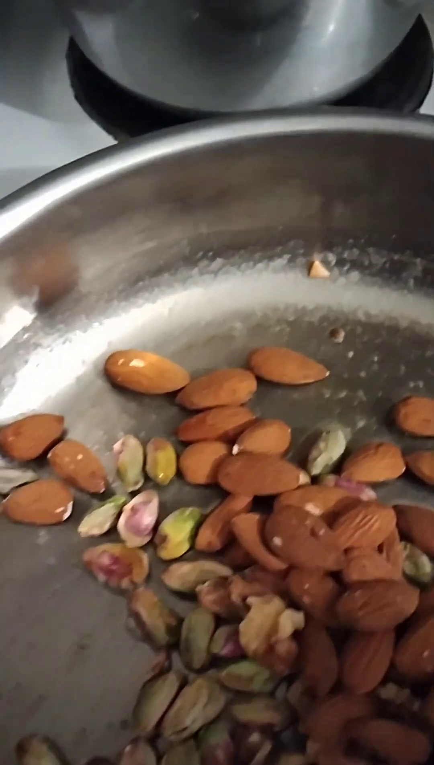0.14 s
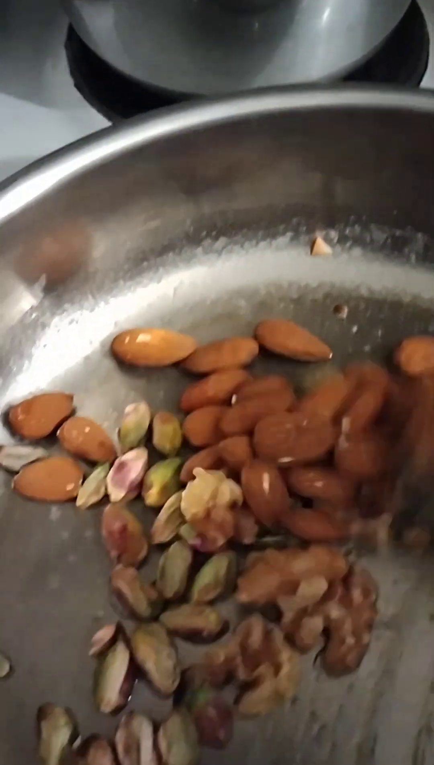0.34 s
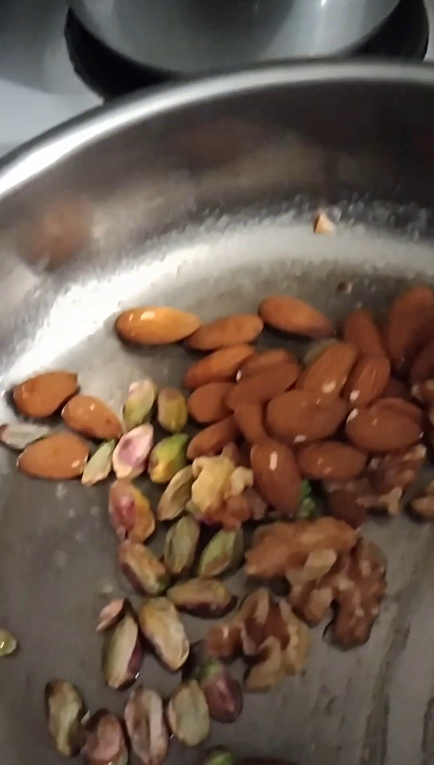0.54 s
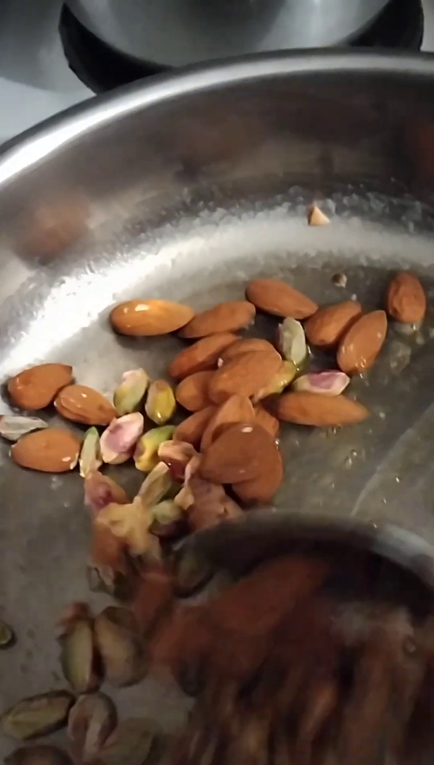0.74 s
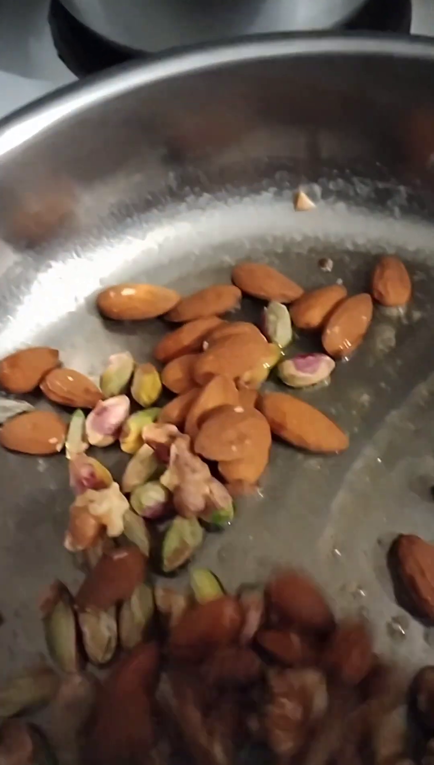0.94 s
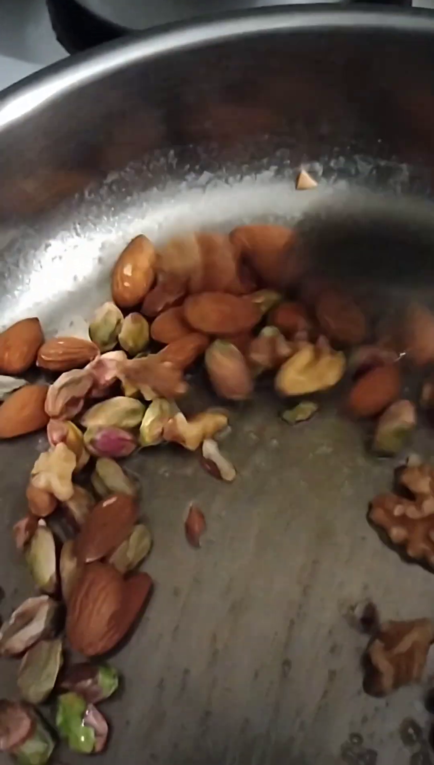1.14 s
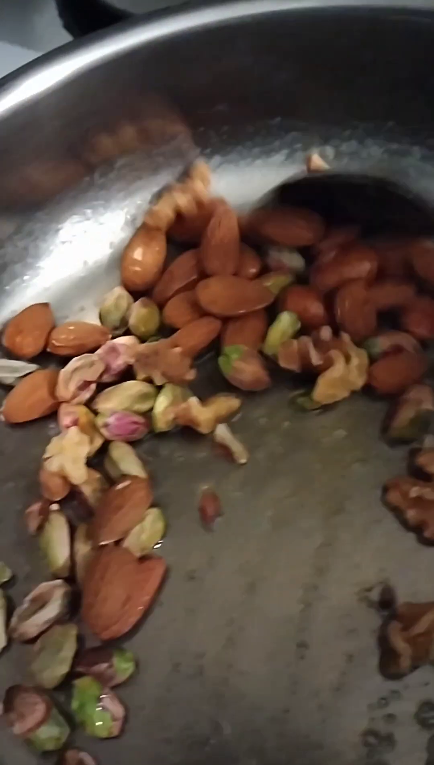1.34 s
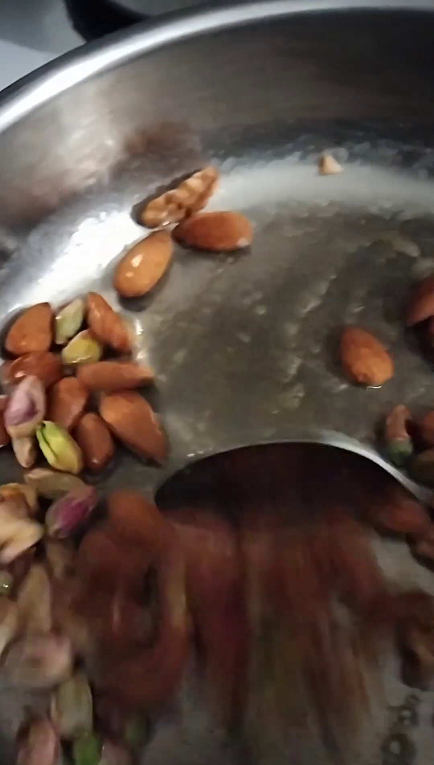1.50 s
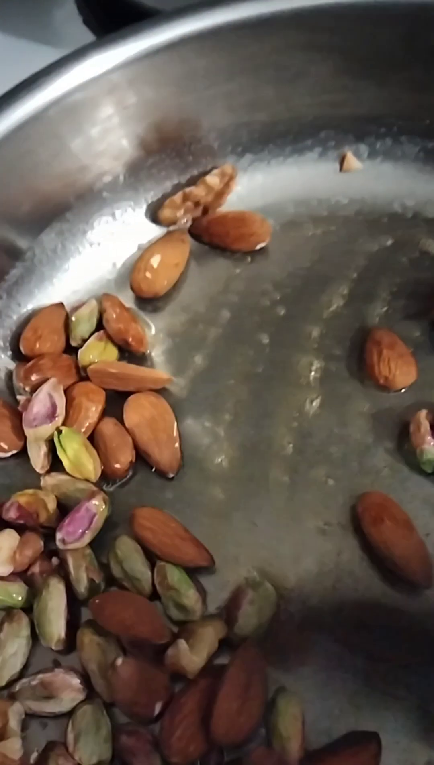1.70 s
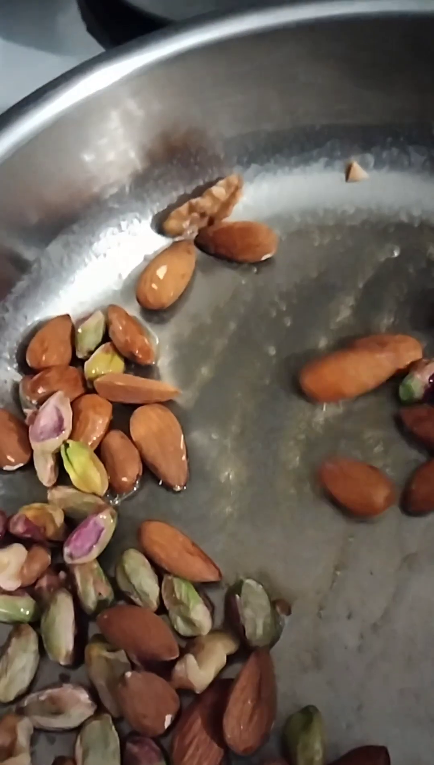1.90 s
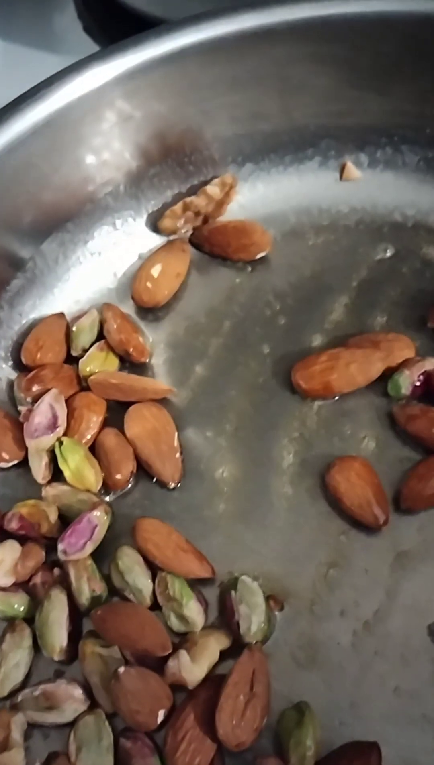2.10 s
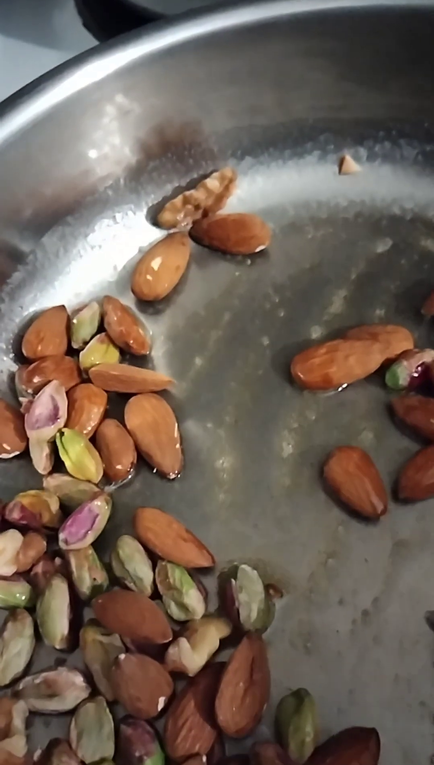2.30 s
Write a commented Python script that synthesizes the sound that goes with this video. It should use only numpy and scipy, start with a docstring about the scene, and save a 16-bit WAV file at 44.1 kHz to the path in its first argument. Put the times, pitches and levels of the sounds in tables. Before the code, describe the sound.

Nuts are stirred with a metal spoon in a steel pan, heard close in a small kitchen. After near quiet with tiny fat pops, a ringing clank at 0.2 s leads into a scrape; more knocks and short rasping scrapes follow around 0.65, 1.0 and 1.4 s. Nuts click and patter throughout. A knock at 1.8 s, crackling fat, then a bright rim chatter at 2.05 s rings and fades.

```python
"""A steel spoon knocks on a frying pan and scrapes across it in four strokes, close to the microphone in a small kitchen.
Nuts click and patter around it, hot fat crackles and pops, and near the end the spoon chatters on the rim.
Blows are short noise bursts with decaying steel modes; the scrape is stick-slip impulses through resonances plus
a coarse rasp. Nuts and bubbles are random contacts tuned by size. A short room tail and kitchen air lie behind."""
import sys
import numpy as np
from scipy import signal
from scipy.fft import rfft, irfft, next_fast_len
from scipy.io import wavfile
from scipy.ndimage import uniform_filter1d, map_coordinates

SR = 44100
rng = np.random.default_rng(int(sys.argv[2]) if len(sys.argv) > 2 else 0)


def int16_out(signal):
    """Quantize to a 16-bit WAV file."""
    q = np.round(np.clip(np.atleast_2d(signal).T, -1, 1) * 32767)
    wavfile.write(sys.argv[1], SR, q.astype(np.int16))


N = 103635  # length in samples


def amp(db):
    """Gain of a level in dB."""
    return 10 ** (np.asarray(db) / 20)


def unit(x):
    """Scale to rms 1."""
    return x / np.sqrt(np.mean(x ** 2) + 1e-20)


def peak_unit(x, size=176):
    """Scale so that the loudest 4 ms have rms 1."""
    power = uniform_filter1d(x ** 2, size, mode="constant")
    return x / np.sqrt(power.max() + 1e-20)


def clock():
    """Half-second time axis of one blow, in seconds."""
    return np.arange(SR // 2) / SR


def along(points, hz):
    """Read (Hz, value) points on a log frequency axis."""
    f, v = np.transpose(points)
    return np.interp(np.log(hz + 1), np.log(f + 1), v)


def level(rows, outside=None):
    """Gain per sample from (s, dB) points; the end values hold unless an outside dB is given."""
    s, db = np.transpose(rows)
    return amp(np.interp(np.arange(N) / SR, s, db, outside, outside))


def wobble(rate):
    """A random curve through `rate` random values a second."""
    return map_coordinates(rng.standard_normal(2000), [np.arange(N) * rate / SR], mode="wrap")


def add(track, s, x):
    """Mix x in at time s."""
    i = max(round(s * SR), 0)
    track[i:i + len(x)] += x[:len(track) - i]


def colour(x, points, size=4096):
    """Causal minimum-phase filter with the given (Hz, dB) shape."""
    log_gain = np.log(amp(along(points, np.fft.rfftfreq(size, 1 / SR))))
    cepstrum = irfft(log_gain)
    # fold the cepstrum forward so the filter never sounds early
    cepstrum[1:size // 2] *= 2
    cepstrum[size // 2 + 1:] = 0
    return signal.fftconvolve(x, irfft(np.exp(rfft(cepstrum))))[:len(x)]


def resonate(x, peaks, q):
    """Pass x through parallel (Hz, dB) resonances of sharpness q."""
    m = next_fast_len(len(x) + SR // 10, True)
    f = np.fft.rfftfreq(m, 1 / SR)
    response = sum(amp(db) * f / (f + 1j * q * (f * f - c * c) / c) for c, db in peaks)
    return irfft(rfft(x, m) * response, m)[:len(x)]


def burst(t60):
    """Noise that falls by 60 dB in t60 seconds."""
    t = clock()
    return rng.standard_normal(len(t)) * amp(-60 * t / t60)


RING_WAVER = .85  # phase unsteadiness of ringing steel, radians


def ring(modes, t60):
    """Decaying (Hz, dB) modes of steel, each with a slightly unsteady phase."""
    t = clock()
    tones = 0
    for hz, db in modes:
        waver = RING_WAVER * wobble(171.0)[:len(t)]
        tones = tones + amp(db) * np.sin(2 * np.pi * hz * t + waver)
    return peak_unit(amp(-60 * t / t60) * tones)


def contacts(rate, spread_db):
    """Random impulses of either sign and uneven size, `rate` a second on average."""
    size = amp(spread_db * np.clip(rng.standard_normal(N), -2, 2))
    return (rng.random(N) < rate / SR) * rng.choice([-1, 1], N) * size


# spoon knocks on the pan: start_s, bass_db, middle_db, treble_db, rattle_t60_s, ring_db (relative), pitch_hz
KNOCK_ROWS = [(0.185, -26.5, -14.5, -12, 0.26, 0, 1947), (0.2033, -14.5, -12, -24.5, 0.021, -7, 850),
              (0.6382, -53, -11.5, -11, 0.029, -25, 2984), (0.9824, -26, -20.5, -29.5, 0.062, -31, 446),
              (1.005, -22.5, -23, -18.5, 0.035, -11, 6330), (1.027, -18.5, -16, -15, 0.058, -18, 4030),
              (1.3609, -30, -19.5, -13, 0.034, -19, 820), (1.801, -22, -18, -18.5, 0.059, -13, 960)]
# ring of the pan: mode_hz, level_db (relative)
PAN_MODES = [(1903, -9), (2700, -4.5), (3140, -5), (5647, -9.5), (6600, -10)]
# edges of the bass, middle and treble bands: edge_hz
BAND_EDGES = [330, 900, 2400, 8300]
CRACK_T60, KNOCK_T60, PAN_T60 = .004, .028, 0.33  # decays, s
KNOCK_DB = -3.5  # pitched knock against the loudest band


def knocks():
    """Each blow is a crack, a rattle and the pan's ring, balanced in three bands, with a short pitched knock."""
    out = np.zeros(N)
    for s, *band_db, rattle_t60, ring_db, knock_hz in KNOCK_ROWS:
        blow = peak_unit(burst(CRACK_T60)) + peak_unit(burst(rattle_t60))
        blow += amp(-1.5) * burst(0.033)
        blow += amp(ring_db) * ring(PAN_MODES, PAN_T60)
        add(out, s, amp(max(band_db) + KNOCK_DB) * ring([(knock_hz, 0)], KNOCK_T60))
        for edges, db in zip(zip(BAND_EDGES, BAND_EDGES[1:]), band_db):
            band = signal.butter(2, edges, "band", fs=SR, output="sos")
            add(out, s, amp(db) * peak_unit(signal.sosfilt(band, blow)))
    return out


# low thuds of the pan on the hob: start_s, level_db, pitch_hz
THUD_ROWS = [(0.202, -27, 65), (0.643, -25, 53), (0.983, -22.5, 170), (1.728, -29, 268), (1.789, -30, 148),
             (2.062, -29, 95)]
THUD_T60 = 0.14  # decay, s


def thuds():
    """Decaying noise through one broad low resonance: the pan bumps on the hob."""
    out = np.zeros(N)
    for s, db, hz in THUD_ROWS:
        add(out, s, amp(db) * peak_unit(resonate(burst(THUD_T60), [(hz, 0)], q=1.7)))
    return out


# the edge catches unevenly: catches per second, spread in dB, sharpness of each pitch
CATCH_PER_S, CATCH_SPREAD_DB, CATCH_Q = 110, 7.5, 8


def rasp():
    """Twenty pitches of noise flare separately as the edge catches, so the coarse colour keeps shifting."""
    bands = 0
    for hz in np.geomspace(700, 14000, 20):
        catches = amp(CATCH_SPREAD_DB * np.clip(wobble(CATCH_PER_S), -2, 1))
        bands = bands + resonate(rng.standard_normal(N) * catches, [(hz, 0)], CATCH_Q)
    return unit(bands)


# four strokes of the spoon, one list of points each: time_s, level_db
STROKE_LEVELS = [
    [(.215, -32), (.29, -32), (.336, -17.5), (.36, -25.5), (.375, -46)],
    [(.645, -28), (.72, -22), (.757, -20), (.775, -29)],
    [(1.035, -28.5), (1.114, -16.5), (1.131, -19.5), (1.146, -29)],
    [(1.425, -28), (1.45, -29), (1.475, -18), (1.55, -16.5), (1.6, -37)],
]
# colour of each stroke, one row each: level_db at every frequency of COLOUR_POINTS (relative)
STROKE_SHAPES = [
    [-25, -3, -2, 4, -18, 8, 0.5, -2.5],
    [-11, 3, 0.5, 0, -3, -4.5, -14.5, -11],
    [1, 10, -7, 26, 5.5, 21.5, 9, 8.5],
    [4, 0.5, 14.5, 2, 2.5, 4, -11, -9],
]
# frequencies of the stroke colours: pitch_hz
COLOUR_POINTS = [300, 1000, 1900, 3700, 4800, 7000, 11500, 13600]
# how much of each stroke rings in the steel: power_share (0 to 1)
STEEL_SHARES = [0.93, 0.089, 0.8, 0.26]
# rubbed resonances of the steel: pitch_hz, level_db (relative)
STEEL_PEAKS = [(1060, 16), (2660, -3), (3180, 6), (4055, 3), (5380, 10.5), (6900, -2), (7650, -10),
               (13700, 9.5)]
STEEL_Q = 45
SLIPS_PER_S, SLIP_SPREAD_DB, JUDDER_DB = 1800, 4, 2.2
GLIDE_SAMPLES = 10.3  # scale of the random time shift that bends the resonances


def scrapes():
    """The edge sticks and slips: a coarse rasp plus steel that wavers as the contact point moves."""
    out = np.zeros(N)
    judder = amp(JUDDER_DB * np.clip(wobble(170), -2, 1))
    slips = contacts(SLIPS_PER_S, SLIP_SPREAD_DB) * judder
    ringing = resonate(slips, STEEL_PEAKS, STEEL_Q)
    steel = unit(map_coordinates(ringing, [np.arange(N) + GLIDE_SAMPLES * wobble(35)]))
    grit = unit(rasp() * judder)
    for stroke, shape, share in zip(STROKE_LEVELS, STROKE_SHAPES, STEEL_SHARES):
        rub = np.sqrt(share) * steel + np.sqrt(1 - share) * grit
        rub = unit(colour(rub, list(zip(COLOUR_POINTS, shape))))
        out += level(stroke, -120) * rub  # all but silent outside its stroke
    return out


# colour of a nut-sized contact: pitch_hz, level_db (relative)
CLICK_COLOUR = [(300, -3), (800, 10), (2600, 1.5), (4000, 1.5), (6300, -1.5), (11000, -19)]
NUT_T60, NUT_TAIL_T60 = .014, .06  # decays, s


def click():
    """A hard little contact: a short noise burst with a weaker, longer tail."""
    return peak_unit(colour(peak_unit(burst(NUT_T60)) + amp(-7) * burst(NUT_TAIL_T60), CLICK_COLOUR))


# light touches of the spoon's bowl on the pan: start_s, level_db
PING_ROWS = [(0.5002, -17), (0.5403, -28), (1.588, -18.5)]
# ring of the spoon's bowl: mode_hz, level_db (relative)
SPOON_MODES = [(5380, 0), (6630, -4)]
SPOON_T60 = .04  # decay, s


def pings():
    """Light touches click and set the bowl's modes ringing."""
    out = np.zeros(N)
    for s, db in PING_ROWS:
        add(out, s, amp(db) * peak_unit(click() + ring(SPOON_MODES, SPOON_T60)))
    return out


# ring of the rim: mode_hz, level_db (relative)
RIM_MODES = [(1125, -2), (2080, -8), (2762, -2.5), (4678, -13)]
# colour of the chatter: pitch_hz, level_db (relative)
CHATTER_COLOUR = [(1900, 0), (4400, -2), (5600, 9.5), (9000, 3.5)]
RIM_S, RIM_HOLD_S, RIM_T60, RIM_RING_T60 = 2.0395, 0.027, 0.058, 0.54  # start, hold and decays, s
RIM_DB, RIM_RING_DB = -12.5, -30


def rim():
    """The spoon chatters briefly on the rim, as held then fading noise, and the rim's modes ring on."""
    out, t = np.zeros(N), clock()
    fade = amp(-60 * np.maximum(t - RIM_HOLD_S, 0) / RIM_T60)
    chatter = unit(colour(rng.standard_normal(len(t)), CHATTER_COLOUR)) * fade
    add(out, RIM_S, amp(RIM_DB) * chatter + amp(RIM_RING_DB) * ring(RIM_MODES, RIM_RING_T60))
    return out


# single nuts dropping on the steel: start_s, level_db, pitch_hz
NUT_ROWS = [(0.4446, -23.5, 3570), (0.5677, -22, 3540), (0.597, -18.5, 763), (0.815, -23.5, 3630),
            (0.84, -28.5, 1500), (0.879, -22.5, 3350), (1.277, -29.5, 3640), (1.301, -32, 3560),
            (1.3482, -20.5, 960), (1.422, -19, 3170), (1.688, -23.5, 2200), (1.733, -26.5, 1500),
            (1.78, -20, 4130), (1.859, -23.5, 4000), (2.19, -35, 1960), (2.339, -36, 2830)]
NUT_RING_DB, NUT_Q = 0, 9


def single_nuts():
    """Each nut is a click plus a short burst through one resonance at its own pitch."""
    out = np.zeros(N)
    for s, db, hz in NUT_ROWS:
        tone = peak_unit(resonate(burst(NUT_T60), [(hz, 0)], NUT_Q))
        add(out, s, amp(db) * peak_unit(click() + amp(NUT_RING_DB) * tone))
    return out


# the heap tumbling and settling: time_s, level_db (before the trims PATTER_DB and BODY_DB)
TUMBLE_LEVEL = [(.19, -66), (.24, -33.5), (.87, -33.5), (.96, -41.5), (1.16, -28.5), (1.28, -38.5),
                (1.42, -30.5), (1.7, -35), (1.85, -33.5), (2.03, -46.5), (2.35, -54.5)]
# contacts per second of each size of nut, spread in dB, sharpness of pitch
PATTER_PER_S, PATTER_SPREAD_DB, PATTER_Q = 36, 4, 3
PATTER_DB = -3.5


def heap():
    """Sparse patter of five sizes of nut: random clicks, small nuts pitched higher than large ones."""
    patter = 0
    for hz in np.geomspace(1000, 4800, 5):
        hits = signal.fftconvolve(contacts(PATTER_PER_S, PATTER_SPREAD_DB), click())[:N]
        patter = patter + unit(resonate(hits, [(hz, 0)], q=PATTER_Q))
    return amp(PATTER_DB) * level(TUMBLE_LEVEL) * unit(patter)


# the pan's low resonances: pitch_hz, level_db (relative)
BODY_PEAKS = [(125, 2.5), (430, -7.5), (720, 4), (1040, 2)]
BODY_DB, BODY_Q = -4, 6.3


def pan_body():
    """Hollow murmur: noise through the pan's low resonances, shaken as the heap tumbles."""
    body = unit(resonate(rng.standard_normal(N), BODY_PEAKS, BODY_Q))
    return amp(BODY_DB) * level(TUMBLE_LEVEL) * body


# loud pops of fat: start_s, level_db
POP_ROWS = [(0.032, -38.5), (.054, -35.5), (1.392, -25.5), (1.634, -21), (1.716, -30), (1.8697, -24.5),
            (1.9884, -24.5)]
# crackle of the small bubbles: time_s, level_db
SIZZLE_LEVEL = [(.3, -65), (.85, -46.5), (1.25, -48), (1.75, -39.5), (2.2, -47.5)]
# colour of pops and bubbles: pitch_hz, level_db (relative)
FAT_COLOUR = [(500, -97), (3000, -15.5), (8000, 3)]


def fat():
    """Tiny bubbles of eight sizes burst as random impulses through resonances, with a few sharp noise pops."""
    pops = np.zeros(N)
    for s, db in POP_ROWS:
        add(pops, s, amp(db) * peak_unit(colour(burst(0.0032), FAT_COLOUR)))
    bubbles = 0
    for hz in np.linspace(4500, 14500, 8):
        bubbles = bubbles + unit(resonate(contacts(36, 7.5), [(hz, 0)], q=4.5))
    return pops + level(SIZZLE_LEVEL) * unit(colour(bubbles, FAT_COLOUR))


ROOM_DB, ROOM_T60, ROOM_TOP_HZ = -12, 0.32, 9000  # decay in s


def kitchen(x):
    """A short room tail: x convolved with decaying, softened noise."""
    soften = signal.butter(1, ROOM_TOP_HZ, fs=SR, output="sos")
    tail = signal.sosfilt(soften, burst(ROOM_T60))
    return signal.fftconvolve(x, tail / np.linalg.norm(tail))[:N]


# colour of the kitchen air: pitch_hz, level_db (relative)
AIR_COLOUR = [(90, 3.5), (420, -5), (1800, -40), (9000, -14)]
AIR_DB = -53


def kitchen_air():
    """Steady coloured noise behind everything."""
    return amp(AIR_DB) * unit(colour(rng.standard_normal(N), AIR_COLOUR))


def scene():
    """The pan close up with its room tail; body murmur and kitchen air are added without the tail."""
    spoon = knocks() + thuds() + scrapes() + pings() + rim()
    pan = spoon + single_nuts() + heap() + fat()
    # the heap's patter and the fat reach the room too
    return (pan + amp(ROOM_DB) * kitchen(pan) + pan_body() + kitchen_air())[None]


TOP_HZ = 16000  # band limit of the recorder


def record(dry):
    """The recorder clips at full scale and keeps nothing above its band limit."""
    m = next_fast_len(N + SR // 2)
    spectrum = rfft(np.clip(dry, -1, 1), m)
    passed = np.fft.rfftfreq(m, 1 / SR) < TOP_HZ
    return irfft(spectrum * passed, m)[..., :N]


dry = scene()
out = record(dry)
int16_out(out)
```